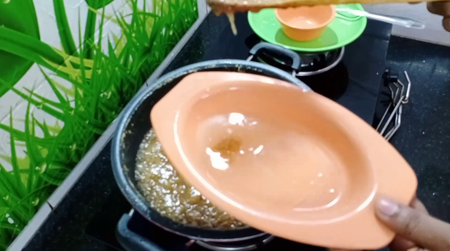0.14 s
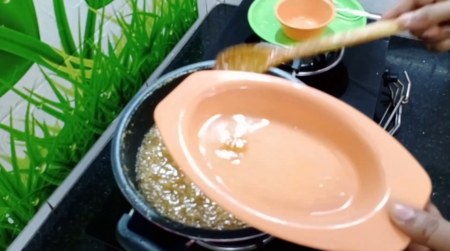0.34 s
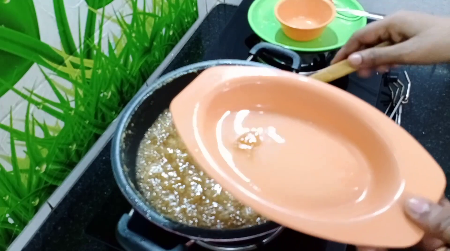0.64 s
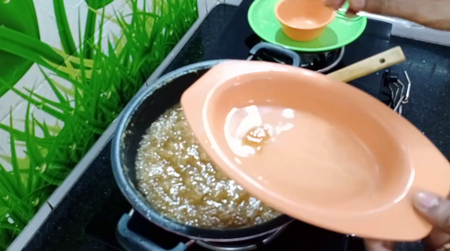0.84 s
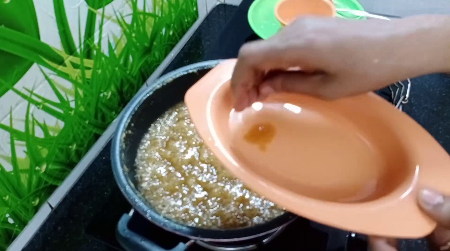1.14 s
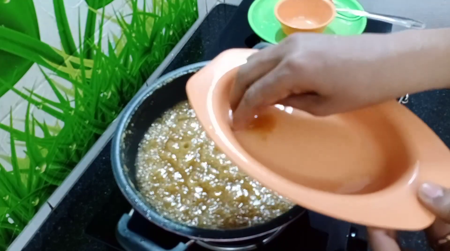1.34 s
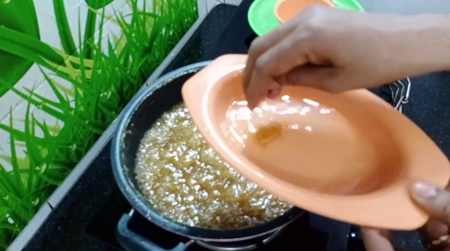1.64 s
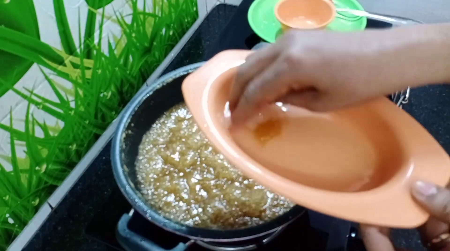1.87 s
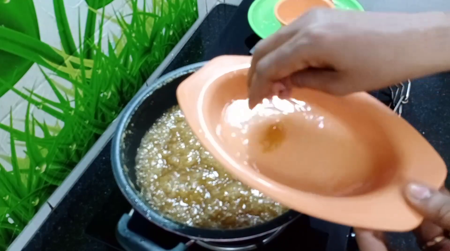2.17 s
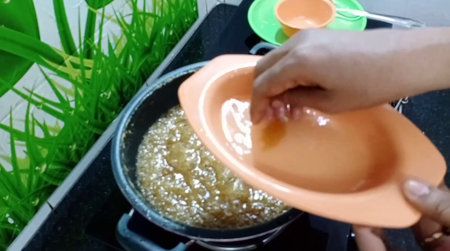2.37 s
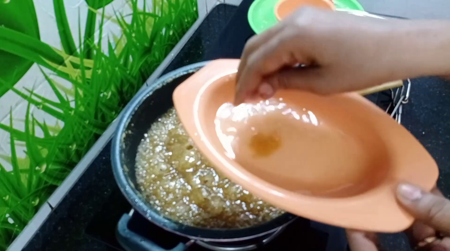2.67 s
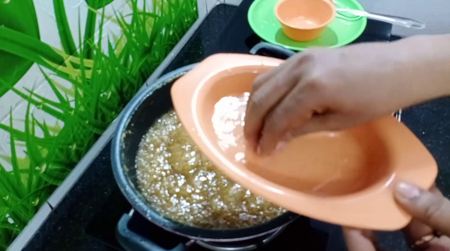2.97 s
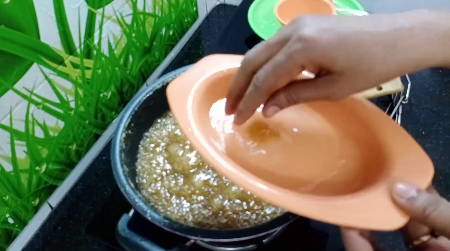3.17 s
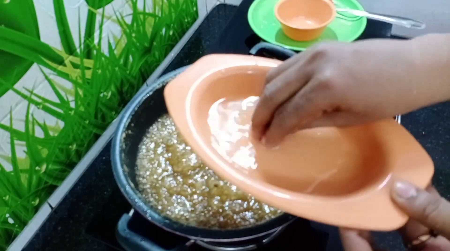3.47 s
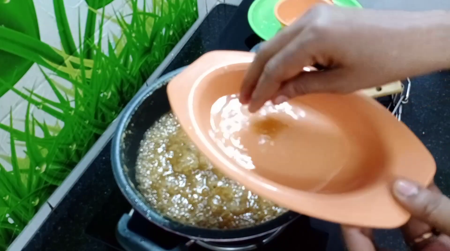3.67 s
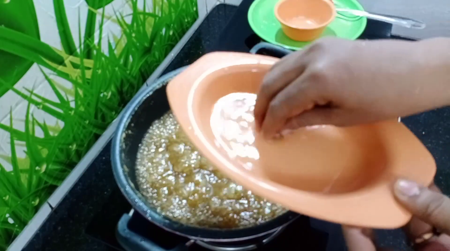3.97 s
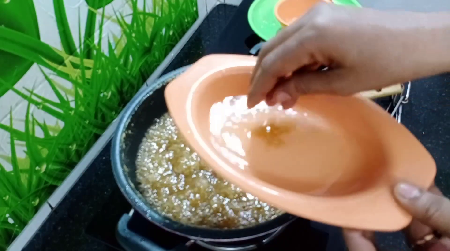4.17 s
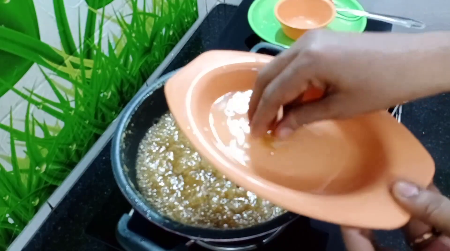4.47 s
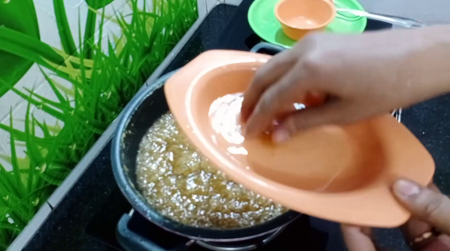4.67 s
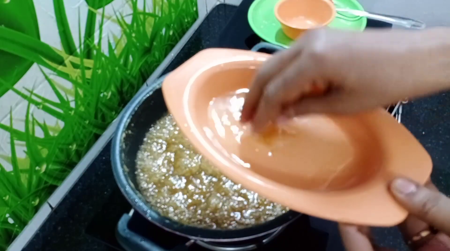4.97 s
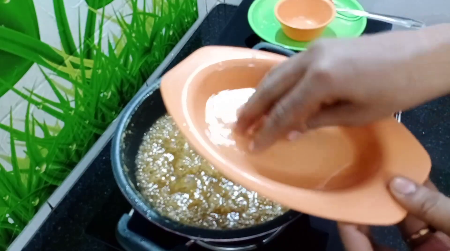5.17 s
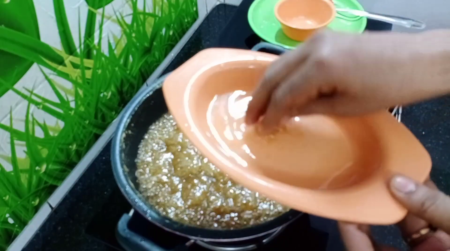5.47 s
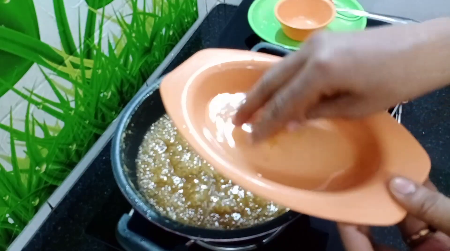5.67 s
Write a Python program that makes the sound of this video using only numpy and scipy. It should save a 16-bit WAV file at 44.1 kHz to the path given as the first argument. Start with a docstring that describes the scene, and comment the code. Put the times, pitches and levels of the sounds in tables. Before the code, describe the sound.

A close stereo take of a pan of bubbling syrup in a home kitchen: hollow mid-pitched plops, dense wet crackle, and airy sizzle run from start to end. Individual bubbles pop clearly, some ringing briefly with the pan, and little blisters burst with tiny spits of steam. Activity fluctuates rapidly but never stops. Stove rumble and faint hum remain low, and the room adds barely any echo.

```python
"""Thick sugar syrup boils in a pan on a kitchen stove, each torn bubble a decaying sine of rising pitch.
Large bubbles gulp and plop in heaves, smaller ones crackle in flurries with lulls, and fine foam fizzes.
Filtered noise makes the steam; now and then a blister rings and lets out a spit of it.
Resonant filters colour the bubbling as the pan does; a noise rumble, a drone and faint hum lie beneath."""
import sys
import numpy as np
from scipy import signal
from scipy.fft import rfft, irfft
from scipy.io import wavfile
from scipy.ndimage import uniform_filter1d

SR = 44100
rng = np.random.default_rng(int(sys.argv[2]) if len(sys.argv) > 2 else 0)


def int16_out(signal):
    """Quantize to a 16-bit WAV file."""
    q = np.round(np.clip(np.atleast_2d(signal).T, -1, 1) * 32767)
    wavfile.write(sys.argv[1], SR, q.astype(np.int16))


N = 256522


def amp(db):
    """Logarithmic level: converts decibels to amplitude gain."""
    return 10 ** (np.asarray(db) / 20)


def unit(x):
    """Normalisation: scales a signal to rms 1."""
    return x / np.sqrt(np.mean(x ** 2) + 1e-20)


def read(points, hz):
    """Logarithmic frequency axis: interpolates a spectrum between its points."""
    f, value = np.transpose(points)
    return np.interp(np.log(hz + 1), np.log(f + 1), value)


def follow(rows, axis):
    """Linear interpolation in time: one column of a curve at every sample."""
    rows = np.asarray(rows)
    return np.interp(np.arange(N) / SR, rows[:, 0], rows[:, axis])


def drift(rate_hz):
    """Low-pass random process: a slow wander of rms 1."""
    count, step = 2 ** 13, 2 ** 6
    hz = np.fft.rfftfreq(count, step / SR)
    spectrum = rfft(rng.standard_normal(count)) / (1 + (hz / rate_hz) ** 2)
    slow = irfft(spectrum)
    return unit(np.interp(np.arange(N) / step, np.arange(count), slow))


def add(mix, s, sound):
    """Superposition: mixes a sound in at time s."""
    part = mix[round(s * SR):][:len(sound)]
    part += sound[:len(part)]


def surges(rows, attack_s, release_s, axis):
    """Incoherent addition: events rise, hold and die away, and overlapping ones add in power."""
    power, t = np.zeros(N), np.arange(SR // 2) / SR
    for row in rows:
        rise = np.minimum(t / attack_s, 1)
        decay = np.exp(-np.maximum(t - row[1], 0) / release_s)
        add(power, row[0], (amp(row[axis]) * rise * decay) ** 2)
    return np.sqrt(power)


def lifts(peaks, hz):
    """Resonance: sums the bell-shaped rises and hollows, in dB, of a set of modes."""
    return sum(db / (1 + (2 * (hz - f) / width) ** 2) for f, width, db in peaks)


def colour(x, db_at):
    """Minimum phase: a causal filter of gain db_at(Hz), whose resonances ring after each click."""
    log_gain = np.log(amp(db_at(abs(np.fft.fftfreq(2 ** 13, 1 / SR)))))
    # the Hilbert transform of the log gain supplies the phase
    response = np.exp(np.conj(signal.hilbert(log_gain)))
    taps = np.fft.ifft(response).real[:2 ** 12]
    return signal.oaconvolve(x, taps)[:N]


# colour of the bubbling: f/Hz, relative spectral level/dB
SYRUP_COLOUR = [(300, -16), (590, -28), (670, -6.5), (980, -2), (1150, -11), (1350, 0.5), (3000, -0.5),
                (4800, 0), (6200, 1), (8000, 0), (9000, -5.5), (11500, -8.5), (15300, -1.5)]
# resonances of the pan and the hollows between them: f/Hz, width/Hz, lift/dB
PAN_MODES = [(716, 22, 4), (758, 22, -2), (873, 50, 10.5), (956, 23, 6), (1116, 35, 7.5), (1180, 110, -4.5),
             (1242, 49, 10.5), (1466, 32, 1.5), (1467, 19, 8), (1593, 18, 5), (1650, 21, 5),
             (1805, 1000, -6), (2080, 99, 9.5), (2243, 82, 5), (2480, 150, -3), (2573, 38, 7),
             (2690, 79, 4.5), (3026, 54, 3), (3305, 51, 5.5), (3394, 98, -7), (3750, 68, 4.5),
             (5080, 200, -2), (5600, 410, 1.5)]
# a broad treble resonance: f/Hz, width/Hz, lift/dB
TREBLE_MODE = [(7184, 1160, 9)]


def pan(x, stretch=1):
    """Modal filtering: the syrup surface in the ringing pan; stretch scales the pan's resonances."""
    return colour(x, lambda hz: (read(SYRUP_COLOUR, hz)
                                 + lifts(PAN_MODES, hz / stretch)
                                 + lifts(TREBLE_MODE, hz)))


def swaying_pan(x, sway=.008, sway_hz=2.5):
    """Modal drift: crossfades two slightly detuned pans, as the heaving syrup shifts the resonances."""
    share = .5 + .5 * np.tanh(2 * drift(sway_hz))
    return share * pan(x, 1 + sway) + (1 - share) * pan(x, 1 - sway)


def pop(hz, cycles, t, glide=0.05):
    """Damped oscillation: a torn bubble rings for a few cycles, rising as its hole widens."""
    turns = hz * t
    decay = np.exp(-turns / cycles)
    onset = 1 - np.exp(-2 * turns)
    return np.sin(2 * np.pi * turns * (1 + glide * (1 - decay))) * decay * onset


def spits(per_s=170, spread_db=3.5, fade_s=0.006, leak=0.75):
    """Jet flow: gain of steam whose randomly timed jets start at once and die in milliseconds."""
    strength = amp(spread_db * np.minimum(rng.exponential(1, N), 3.1))
    power = strength ** 2 * (rng.random(N) < per_s / SR)
    power = signal.lfilter([1], [1, -np.exp(-2 / (fade_s * SR))], power)
    supply = uniform_filter1d(power, size=6000)  # the heat makes steam at an even rate
    return unit(np.sqrt(power / (abs(supply) + 1e-9) + leak))


def hiss(lo_hz, hi_hz):
    """Turbulence noise: steam leaking through holes of one range of sizes, as band-passed noise."""
    band = signal.butter(2, [lo_hz, min(hi_hz, SR / 2 - 1)], "band", fs=SR, output="sos")
    return unit(signal.sosfilt(band, rng.standard_normal(N)))


def even_out(x, share=0.82):
    """Steady heat supply: bubbles of one size keep nearly the same power from moment to moment."""
    power = uniform_filter1d(uniform_filter1d(x ** 2, size=1800), size=1800)
    power = abs(power) + 1e-9
    return unit(x / power ** (np.clip(share, 0, 1) / 2))


def bubbles(lo_hz, hi_hz, jets, trains_per_s, cycles, spread_db, gap_s, steam, fade_db,
            detune=0.066, count=5):
    """Clustered point process: each tear starts a train of like-sized neighbours, among hissing jets."""
    t = np.arange(int(4 * cycles * SR / lo_hz)) / SR
    trains = int(trains_per_s * N / SR)
    draws = np.random.default_rng(rng.integers(2 ** 31)).random((trains, 3 + 3 * count)).T
    at = (np.arange(trains) + 2 * draws[0] - 1) / trains_per_s
    hz = lo_hz * (hi_hz / lo_hz) ** draws[1]
    # higher pops are shorter, so they are made stronger to carry equal energy
    size_db = spread_db * np.minimum(-np.log(1 - draws[2]), 3) + 10 * np.log10(hz / lo_hz)
    out = np.zeros(N)
    for k, (wait, pitch, force) in enumerate(draws[3:].reshape(count, 3, -1)):
        pops = pop((hz * (1 + detune * (2 * pitch - 1)))[:, None], cycles, t)
        push = np.sign(force - .5) * (.5 + abs(force - .5))  # either polarity
        pops *= (amp(size_db - fade_db * k) * push)[:, None]
        where = (abs(at) * SR).astype(int)[:, None] + np.arange(len(t))
        out += np.bincount(where.ravel(), pops.ravel(), N)[:N]
        at = at - gap_s * np.log(1 - wait)  # exponential waits of mean gap_s
    surface = unit(out) + steam * jets * hiss(lo_hz, hi_hz)
    return even_out(unit(swaying_pan(surface)))


def snaps(per_s=110, spread_db=2.2, spit_db=-14, spit_s=0.0032):
    """Impulse excitation: thin skins snap as sharp wide-band ticks, each with a brief spit of steam."""
    rate = per_s * amp(7 * drift(60))
    cuts = np.diff(np.floor(np.cumsum(rate) / SR), prepend=0) > 0
    ticks = cuts * amp(spread_db * np.minimum(rng.exponential(1, N), 2))
    tails = signal.lfilter([1], [1, -np.exp(-1 / (spit_s * SR))], ticks)
    return unit(pan(ticks + amp(spit_db) * tails * rng.standard_normal(N)))


# lulls, with a few brief rises: middle t/s, half length t/s, change of simmer/dB, change of foam/dB
LULL_DIPS = [(0.139, 0.042, -6.5, 0), (0.288, 0.037, -4, -1.5), (0.605, .02, -8, -8),
             (1.042, 0.02, -4.5, -2), (1.242, 0.025, -3, 4), (1.498, 0.026, -13, -2),
             (1.964, 0.02, -2.5, -2.5), (2.077, 0.016, 0, -8), (2.397, 0.015, -5, 4),
             (2.487, 0.018, 1.5, -8), (2.617, 0.025, -2, 0), (3.206, 0.024, -2, -0.5),
             (3.632, 0.017, -8, 4.5), (3.84, 0.018, -1.5, -3), (4.243, 0.015, -0.5, -3),
             (4.066, 0.0097, -3, -7), (4.165, .015, -5, 7), (4.414, 0.02, -3.5, -0.5),
             (5.25, 0.011, -2, -1.5), (5.35, 0.011, -1, -5), (5.515, 0.027, -5, 4.5)]


def lull_db(axis):
    """Gaussian modulation: the smooth dips, and few rises, of the simmer or of the foam."""
    t = np.arange(N) / SR
    return sum(row[axis] * np.exp(-np.minimum(((t - row[0]) / row[1]) ** 2, 20)) for row in LULL_DIPS)


# briskness of the simmer, added to its four base levels: t/s, level/dB
SIMMER_CURVE = [(0, 5), (.3, 0.5), (.75, -1.5), (1.0, -1.5), (1.45, 2), (1.8, 1.5), (2.3, 1.5), (2.8, 1.5),
                (3.4, 2), (4.2, 1.5), (4.9, 1.5), (5.82, 1)]
# steady foam, before foam_db: t/s, level/dB
FOAM_CURVE = [(0, -46), (.28, -49.5), (.75, -49), (1.04, -50), (1.4, -48.5), (2.1, -50), (2.5, -50.5),
              (2.8, -47), (3.7, -50.5), (4.4, -50.5), (5, -47.5), (5.82, -50.5)]
# small bubbles tearing together, before the flurry trim:
# start t/s, length t/s, coarse crackle level/dB, fine crackle level/dB, foam level/dB
FLURRY_EVENTS = [(0.0, 0.069, -77, -64, -61), (0.345, 0.083, -50.5, -50, -48.5),
                 (0.452, 0.044, -53, -54, -55), (0.57, 0.063, -62, -51.5, -46.5),
                 (0.645, 0.053, -58.5, -49.5, -53), (0.7, 0.13, -55.5, -54, -54),
                 (0.891, 0.091, -63, -53.5, -67), (1.058, 0.05, -64, -50.5, -72),
                 (1.139, 0.075, -54.5, -50, -53), (1.32, 0.16, -57.5, -54, -67),
                 (1.468, 0.039, -59, -48, -63), (1.53, 0.022, -51.5, -59, -49),
                 (1.59, 0.09, -64, -50.5, -58), (1.84, 0.079, -59, -56, -64), (1.963, 0.1, -69, -52.5, -58),
                 (2.151, 0.025, -51.5, -49, -62), (2.28, 0.031, -51, -51.5, -47),
                 (2.41, 0.068, -55, -55, -72), (2.515, 0.12, -71, -53.5, -66),
                 (2.721, 0.074, -53.5, -51, -53), (2.875, 0.077, -54, -66, -69),
                 (2.975, 0.056, -51, -62, -61), (3.115, 0.014, -53, -55, -48),
                 (3.235, 0.077, -62.5, -56, -49.5), (3.374, 0.024, -58, -55, -46),
                 (3.462, 0.07, -56, -53, -55), (3.55, 0.083, -56.5, -61, -50), (3.67, 0.084, -71, -68, -46),
                 (3.768, 0.05, -55, -68, -51), (3.887, 0.17, -55, -64, -49),
                 (4.088, 0.036, -52.5, -54.5, -47), (4.182, 0.031, -52.5, -64, -52),
                 (4.27, 0.052, -52.5, -57, -51), (4.459, 0.028, -54, -62, -69),
                 (4.513, 0.079, -53.5, -57, -56), (4.669, 0.04, -51.5, -63, -50),
                 (4.831, 0.077, -54.5, -74, -52), (4.95, 0.055, -51, -47, -58),
                 (5.038, 0.043, -54, -63, -67), (5.118, 0.035, -61, -69, -62),
                 (5.252, 0.063, -52, -52, -56), (5.375, 0.13, -52, -55.5, -61),
                 (5.599, 0.11, -58, -50.5, -53), (5.667, 0.058, -55, -54, -54),
                 (5.75, 0.072, -55, -70, -67)]
FLURRY_ATTACK_S, FLURRY_RELEASE_S = 0.0034, 0.014
# big bubbles heaving up, before heave_db: start t/s, length t/s, plops level/dB, gulps level/dB
HEAVE_EVENTS = [(0.037, 0.052, -59, -59), (0.199, 0.083, -62, -65), (0.35, 0.11, -56, -63.5),
                (0.47, 0.11, -59, -82), (0.67, 0.17, -59, -67), (0.771, 0.15, -62, -70),
                (1.07, 0.1, -60, -67.5), (1.156, 0.041, -60, -63), (1.316, 0.13, -62, -64),
                (1.66, 0.071, -59.5, -67), (1.713, 0.078, -56.5, -64.5), (1.83, 0.058, -63, -71),
                (2.034, 0.044, -62, -61.5), (2.12, 0.062, -67, -61.5), (2.274, 0.02, -55, -60),
                (2.39, 0.1, -76, -64), (2.66, 0.069, -59.5, -70), (2.729, 0.055, -59, -61.5),
                (2.88, 0.065, -66, -72), (3.05, 0.14, -57, -64), (3.309, 0.026, -56, -64),
                (3.36, 0.074, -64, -64), (3.54, 0.14, -67, -70), (3.657, 0.022, -59, -62),
                (3.76, 0.072, -62, -90), (3.86, 0.088, -60.5, -60), (3.925, 0.098, -58.5, -58),
                (4.05, 0.17, -59, -84), (4.28, 0.2, -63, -91), (4.475, 0.13, -59, -70.5),
                (4.68, 0.26, -60, -89), (4.94, 0.13, -57.5, -73), (5.04, 0.13, -63, -83),
                (5.28, 0.028, -62, -66.5), (5.379, 0.053, -74, -61), (5.674, 0.028, -53, -65),
                (5.76, 0.06, -65, -79)]
HEAVE_ATTACK_S, HEAVE_RELEASE_S = 0.0014, 0.016
# base levels of the simmer between heaves and flurries
GULP_DB, PLOP_DB, COARSE_DB, FINE_DB = -83, -68.5, -61, -56


def boil(heave_db=-1.5, flurry_db=-3.5, foam_db=-2.0, snap_db=-3):
    """Size-dependent pitch: heaves drive two large bubble sizes, flurries three small, over a simmer."""
    jets, thin_jets = spits(), spits()
    gulps = bubbles(672.7, 752, jets, trains_per_s=60, cycles=10.2, spread_db=1.5,
                    gap_s=0.0098, steam=0.4, fade_db=5.0)
    plops = bubbles(788.3, 1170, jets, trains_per_s=55, cycles=9.1, spread_db=1.0,
                    gap_s=.009, steam=0.32, fade_db=3.5)
    coarse = bubbles(1174, 2292, jets, trains_per_s=140, cycles=4.5, spread_db=2.0,
                     gap_s=.005, steam=0.48, fade_db=0.5)
    fine = bubbles(2448, 5250, thin_jets, trains_per_s=290, cycles=5.1, spread_db=3.0,
                   gap_s=.003, steam=0.85, fade_db=0.5)
    foam = bubbles(5510, 10680, thin_jets, trains_per_s=480, cycles=14.3, spread_db=4.5,
                   gap_s=.002, steam=0.87, fade_db=1.5)

    def heave(axis):
        """Gain envelope of the heaves."""
        return amp(heave_db) * surges(HEAVE_EVENTS, HEAVE_ATTACK_S, HEAVE_RELEASE_S, axis)

    def flurry(axis):
        """Gain envelope of the flurries."""
        return amp(flurry_db) * surges(FLURRY_EVENTS, FLURRY_ATTACK_S, FLURRY_RELEASE_S, axis)

    simmer = amp(follow(SIMMER_CURVE, axis=1) + lull_db(axis=2))
    froth = amp(follow(FOAM_CURVE, axis=1) + foam_db + lull_db(axis=3))
    # steady and eventful parts add in power
    return (plops * np.hypot(amp(PLOP_DB) * simmer, heave(axis=2))
            + gulps * np.hypot(amp(GULP_DB) * simmer, heave(axis=3))
            + coarse * np.hypot(amp(COARSE_DB) * simmer, flurry(axis=2))
            + (fine + amp(snap_db) * snaps()) * np.hypot(amp(FINE_DB) * simmer, flurry(axis=3))
            + foam * np.hypot(froth, flurry(axis=4)))


# escaping steam, before level_db: t/s, level/dB
STEAM_CURVE = [(0, -61), (.2, -54), (.29, -62), (.4, -59), (.9, -59.5), (1.7, -59), (2.5, -61), (2.75, -54),
               (3.23, -54.5), (3.35, -61), (4.3, -57), (4.42, -62), (4.55, -59), (5.2, -59), (5.82, -57)]


def steam(level_db=-1.3, apart_db=-65, flurry_db=-16, lull_share=0.48):
    """Decorrelation: a shared sizzle follows flurries and lulls; rim foam differs left and right."""
    sizzle = bubbles(10630, 18660, spits(leak=1.1), trains_per_s=1500, cycles=42, spread_db=5.5,
                     gap_s=0.0015, steam=0.95, fade_db=0.0)
    rim = np.array([hiss(6800, 9800), hiss(5700, 14300)])
    steady = amp(follow(STEAM_CURVE, axis=1) + level_db + lull_share * lull_db(axis=3))
    flurry = amp(flurry_db) * surges(FLURRY_EVENTS, FLURRY_ATTACK_S, FLURRY_RELEASE_S, axis=4)
    return sizzle * np.hypot(steady, flurry) + rim * amp(apart_db)


# colour of the rumble: f/Hz, relative spectral level/dB
RUMBLE_COLOUR = [(25, -25.5), (60, -17), (92, 0.5), (115, 3.5), (148, -2), (190, -10), (380, -8.5),
                 (480, -15.5), (700, -15), (2000, -69)]
# rumble: t/s, level/dB
RUMBLE_CURVE = [(0, -68.5), (.35, -67.5), (.46, -71), (.7, -67.5), (1.6, -69.5), (1.72, -72), (1.9, -69.5),
                (2.5, -69), (3.05, -69.5), (3.3, -70.5), (3.45, -68.5), (3.68, -66.5), (3.82, -71.5),
                (4.42, -67), (4.7, -68), (5.1, -70), (5.44, -68), (5.82, -69)]
# faint hum lines: f/Hz, level/dB
HUM_LINES = [(221, -84.5), (259, -84.5), (333, -88)]
# low drone between its swells, before drone_db: t/s, level/dB
DRONE_CURVE = [(0, -77), (.6, -90), (1.8, -74), (2.35, -66), (2.65, -82), (3.4, -75), (4.6, -69),
               (4.95, -73), (5.82, -71)]
# swells of the drone, before drone_db: start t/s, length t/s, level/dB
SWELL_EVENTS = [(0.76, 0.039, -65), (3.44, 0.054, -60.5), (3.67, 0.043, -63), (4.15, 0.059, -59.5),
                (4.32, 0.064, -56.5), (4.52, 0.052, -65), (4.67, 0.066, -64), (4.77, 0.06, -58)]
SWELL_ATTACK_S, SWELL_RELEASE_S = 0.023, 0.0065


def stove(lumpy_db=1.73, drone_db=-1.5, drone_hz=143, waver_hz=1.826):
    """Frequency and amplitude modulation: a lumpy rumble, an unsteady swelling drone, wavering hum."""
    noise = colour(rng.standard_normal(N), lambda hz: read(RUMBLE_COLOUR, hz))
    rumble = unit(noise * amp(lumpy_db * drift(2.8)))
    drone_turns = np.cumsum(drone_hz + 9 * drift(20)) / SR
    drone = unit(np.sin(2 * np.pi * drone_turns) * amp(2.5 * drift(25)))
    hum = np.zeros(N)
    for hz, db in HUM_LINES:
        hum_turns = np.cumsum(hz + waver_hz * drift(4.37)) / SR
        hum += amp(db) * unit(np.sin(2 * np.pi * hum_turns))
    swell = np.hypot(amp(follow(DRONE_CURVE, axis=1)),
                     surges(SWELL_EVENTS, SWELL_ATTACK_S, SWELL_RELEASE_S, axis=2))
    return amp(follow(RUMBLE_CURVE, axis=1)) * rumble + amp(drone_db) * swell * drone + hum


# single fat bubbles, before plop_db and the pan: t/s, level/dB, starting f/Hz, decay/cycles
FAT_BUBBLES = [(0.041, -43, 880, 5.5), (0.058, -43, 950, 6), (0.083, -53, 860, 4.5),
               (0.2097, -41, 746, 6.5), (0.305, -41, 894, 4.5), (0.352, -41, 856, 4.5), (0.4, -34, 940, 3),
               (0.46, -47, 950, 4.9), (0.566, -42.5, 910, 4.5), (0.693, -46, 850, 8),
               (1.321, -42, 900, 4.5), (1.712, -46, 900, 8), (1.76, -49, 870, 8), (1.853, -43, 870, 6.7),
               (2.05, -51, 805, 4.5), (2.2828, -48, 790, 6), (2.299, -41, 950, 4.5), (2.649, -39, 860, 3.7),
               (2.693, -39, 970, 4.5), (2.769, -46, 1040, 6), (3.006, -40, 950, 4.5), (3.0761, -41, 873, 6),
               (3.094, -44, 896, 10), (3.129, -37, 950, 3), (3.1588, -42, 706, 6), (3.3157, -41, 704, 3),
               (3.36, -41, 910, 6.8), (3.558, -43, 864, 5.3), (3.9089, -47, 720, 6),
               (3.9358, -35.5, 730, 6.5), (3.9614, -44, 780, 6), (3.974, -44, 738, 4.5),
               (4.049, -43, 940, 4.5), (4.476, -44, 884, 6.7), (4.676, -43, 840, 3.1),
               (4.9712, -35, 820, 1.6), (5.0014, -31, 1000, 3), (5.132, -45, 895, 4.5),
               (5.568, -46, 850, 4.5), (5.6822, -45, 740, 6)]
# single bubbles that snap or ring out, before the pan: t/s, level/dB, starting f/Hz, decay/cycles
CLEAR_BUBBLES = [(0.0598, -30, 3310, 1.6), (0.1715, -39, 3030, 4.0), (0.2215, -37, 2080, 2.8),
                 (0.3533, -35, 1630, 1.6), (0.3757, -36.0, 2920, 3.0), (0.4116, -36.0, 3310, 3.0),
                 (0.4112, -37, 1680, 1.5), (0.4611, -30, 2440, 1.7), (0.4743, -43, 1810, 13),
                 (0.5382, -34, 1610, 2.0), (0.57, -39.5, 2110, 3.5), (0.656, -34, 4580, 6.0),
                 (0.656, -34, 1450, 1.5), (0.6668, -33.0, 2390, 1.5), (0.7111, -32, 1630, 1.5),
                 (0.8387, -40, 1450, 2.0), (0.904, -42.5, 2640, 11.0), (1.0997, -41, 2390, 12),
                 (1.1062, -34.0, 2520, 3.0), (1.1421, -41, 4820, 11.0), (1.1496, -35.5, 2920, 6.0),
                 (1.18, -36.5, 2270, 6.0), (1.2694, -48, 2050, 11.0), (1.29, -45, 2600, 8.0),
                 (1.3143, -31.5, 2850, 1.5), (1.5485, -33, 4700, 6.0), (1.5924, -39, 1740, 6.0),
                 (1.6361, -36, 3310, 6.8), (1.6524, -28, 4040, 1.5), (1.6639, -43.0, 3100, 11.0),
                 (1.9156, -27.5, 2770, 1.6), (1.9654, -34.5, 5190, 6.0), (2.0056, -27, 4470, 1.7),
                 (2.0559, -44.0, 2740, 11.0), (2.1236, -41, 2090, 6.0), (2.1585, -28, 3480, 1.5),
                 (2.1702, -40.5, 2310, 18), (2.5356, -42.0, 3900, 11.0), (2.5488, -43, 3110, 20.0),
                 (2.7022, -40, 3460, 12), (2.7316, -38, 1680, 3.0), (2.7888, -40, 2450, 6.0),
                 (2.8286, -34, 4360, 6.0), (2.8515, -44.5, 2250, 20.0), (2.9134, -42, 2390, 20.0),
                 (2.9288, -33, 2220, 1.5), (2.9732, -32, 1730, 5.7), (2.9792, -28, 2310, 1.5),
                 (3.033, -29, 2580, 1.5), (3.1246, -26, 3550, 1.7), (3.2665, -43, 2990, 11.0),
                 (3.3803, -32.5, 2920, 1.3), (3.4438, -36.5, 2710, 3.0), (3.4663, -33, 2810, 6.0),
                 (3.4786, -30, 2330, 1.5), (3.6575, -32.0, 2160, 1.5), (3.6791, -35.0, 3480, 6.0),
                 (3.8999, -31.5, 2160, 1.5), (3.9133, -30, 1810, 1.5), (3.9142, -36, 3940, 3.0),
                 (4.031, -42, 2780, 6.0), (4.336, -37.0, 3760, 4.0), (4.4557, -39, 3480, 6.0),
                 (4.466, -38, 2580, 6.0), (4.52, -41.0, 2100, 4.0), (4.543, -46, 1153, 7.2),
                 (4.579, -35.0, 1560, 1.5), (4.6923, -45, 1280, 11.0), (4.696, -38.0, 2800, 6.4),
                 (4.8316, -28.5, 1670, 2.7), (4.9507, -32, 3460, 3.0), (4.962, -31, 4580, 1.5),
                 (4.964, -32.0, 2450, 1.5), (4.974, -44, 2710, 5.4), (4.9896, -31.0, 3480, 1.5),
                 (4.9945, -34.5, 1810, 1.5), (5.0817, -34, 1730, 3.4), (5.122, -44, 1300, 11.0),
                 (5.1492, -31, 2270, 1.5), (5.3128, -36.5, 4200, 6.0), (5.3807, -44, 1660, 6.0),
                 (5.3976, -34, 2710, 3.0), (5.4142, -39.0, 4470, 6.0), (5.4235, -32, 1510, 1.5),
                 (5.6084, -29, 2800, 3.2), (5.6745, -46.0, 1410, 11.0), (5.6845, -33.0, 2580, 1.5),
                 (5.6853, -47, 1424, 11.0), (5.6898, -30, 3480, 1.6), (5.6998, -34.5, 1410, 1.7)]


def blips(level_db=0, plop_db=-8.5):
    """Forced resonance: clear bubbles above the crackle, and fat plopping ones, set the pan ringing."""
    out, t = np.zeros(N), np.arange(2 ** 11) / SR
    for s, db, hz, cycles in CLEAR_BUBBLES:
        add(out, s, amp(db + level_db) * pop(hz, cycles, t, glide=0.032))
    for s, db, hz, cycles in FAT_BUBBLES:
        add(out, s, amp(db + plop_db) * pop(hz, cycles, t, glide=.055))
    no_bass = signal.butter(10, 680, "high", fs=SR, output="sos")
    return colour(signal.sosfilt(no_bass, out), lambda hz: lifts(PAN_MODES, hz))


# bursting blisters, before the room:
# t/s, level/dB, starting f/Hz, spit of steam relative to the ring/dB, decay of the spit t/s
BLISTER_BURSTS = [(0.3258, -29, 7100, -20, .003), (0.584, -37, 7660, -14, .003),
                  (0.627, -33, 6700, -16, .003), (0.6559, -35, 6980, -5, .008),
                  (0.8462, -33, 5800, -14, .003), (0.9815, -37, 6600, -10, .004),
                  (1.2335, -37, 7200, -8, .003), (1.382, -36, 6000, -9, .004), (3.863, -37, 7250, -8, .006),
                  (1.1184, -39, 7400, -10, .003), (1.3332, -34, 5650, -10, .003),
                  (1.4757, -33, 5900, -10, .004), (2.378, -36, 6100, -15, .003),
                  (3.226, -37, 6400, -14, .003), (4.128, -37, 7830, -9, .004),
                  (4.942, -36, 6100, -14, .003), (2.2034, -36, 7100, -9, .004),
                  (2.4044, -35, 7250, -12, .003), (2.7003, -34, 7200, -9, .004),
                  (2.9708, -34, 6760, -12, .003), (3.5194, -37, 7150, -10, .003),
                  (3.8905, -35, 7000, -8, .005), (4.5356, -35, 7350, -10, .003),
                  (4.8883, -35, 6950, -7, .006), (2.8394, -34, 6600, -9, .005),
                  (3.3857, -36, 7100, -6, .008), (3.6755, -38, 7180, -7, .009),
                  (3.766, -30.5, 7540, -7.5, .006), (4.3974, -30, 6100, -16, .003),
                  (4.8309, -33, 7600, -5, .003), (4.9624, -31, 6900, -3, .004),
                  (4.9765, -35, 7300, -6, .01), (5.1377, -36, 7450, -8, .006),
                  (5.1602, -37, 7000, -7, .009), (5.6072, -33, 7500, -6, .005)]


def blisters(ring_cycles=8):
    """Damped oscillation with jet noise: each blister rings and lets out a short, soft spit of steam."""
    out, t = np.zeros(N), np.arange(2 ** 11) / SR
    for s, db, hz, spit_db, spit_s in BLISTER_BURSTS:
        puff = uniform_filter1d(rng.standard_normal(len(t)), size=3)
        spit = unit(pan(puff)[:len(t)]) * np.exp(-t / spit_s)
        add(out, s, amp(db) * (pop(hz, ring_cycles, t) + amp(spit_db) * spit))
    return out


def kitchen(x, room_db=-15, room_t60=0.23, apart_db=-19):
    """Reverberation: a short, weak decaying tail that differs a little between left and right."""
    t = np.arange(SR // 3) / SR
    taps = rng.standard_normal((3, len(t))) * (t > .001) * amp(-60 * t / room_t60)
    taps /= np.linalg.norm(taps, axis=1, keepdims=True)
    response = amp(room_db) * taps[0] + amp(apart_db) * taps[1:]
    response[:, 0] = 1  # direct sound
    response /= np.linalg.norm(response[0])
    return signal.fftconvolve(x[None], response, axes=1)[:, :N]


def scene():
    """Superposition: the boiling pan in the kitchen, with steam above and the stove's rumble below."""
    return kitchen(boil() + blisters() + blips()) + steam() + stove()


# balance of left against right: f/Hz, left minus right level/dB
SIDE_BALANCE = [(100, 3.5), (500, 3.5), (1170, 7), (1800, 4.5), (4300, 4.5), (5600, 3.5), (7000, -3),
                (8500, -14), (10500, -15.5), (12500, -3), (15000, 1)]


def record(dry, edge_hz=15600):
    """Interchannel level difference: each side favours its own bands; a low-pass then limits both."""
    hz = np.fft.rfftfreq(N, 1 / SR)
    left = 1 / (1 + amp(-read(SIDE_BALANCE, hz)))
    heard = irfft(rfft(dry) * 2 * np.array([left, 1 - left]), N)
    low_pass = signal.firwin(511, edge_hz, window=("kaiser", 9), fs=SR)
    return signal.oaconvolve(heard, low_pass[None], "same")


dry = scene()
out = record(dry)
int16_out(out)
```